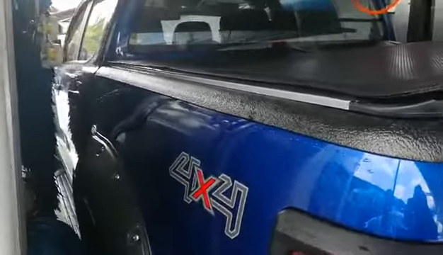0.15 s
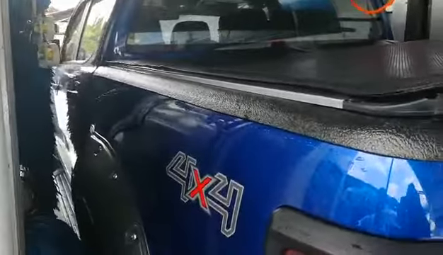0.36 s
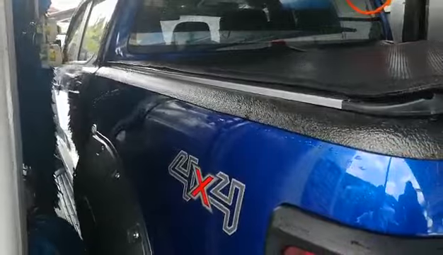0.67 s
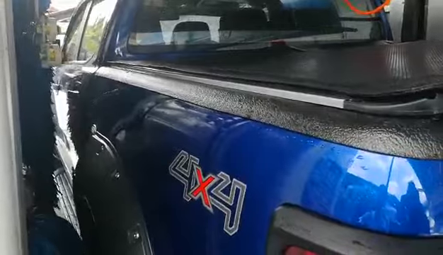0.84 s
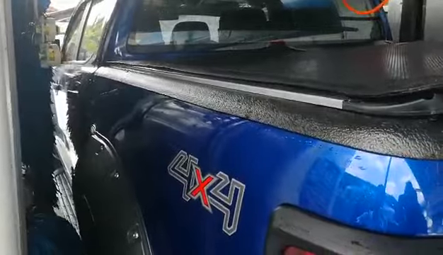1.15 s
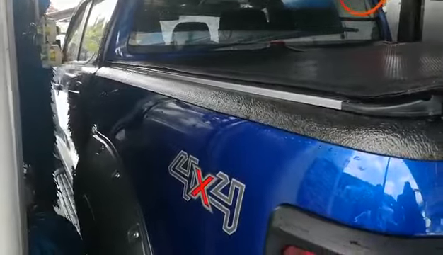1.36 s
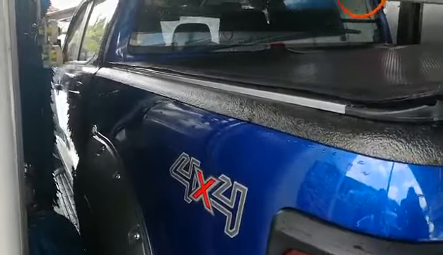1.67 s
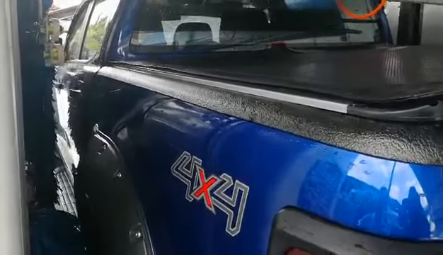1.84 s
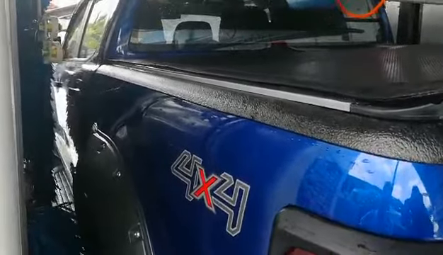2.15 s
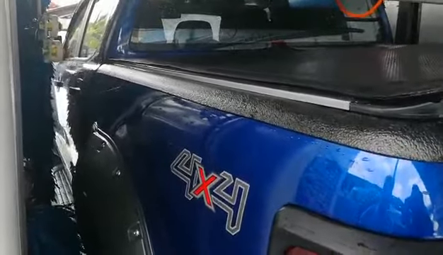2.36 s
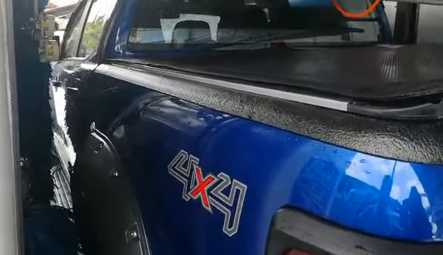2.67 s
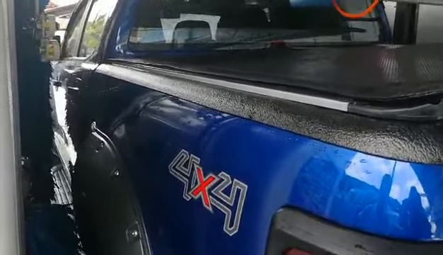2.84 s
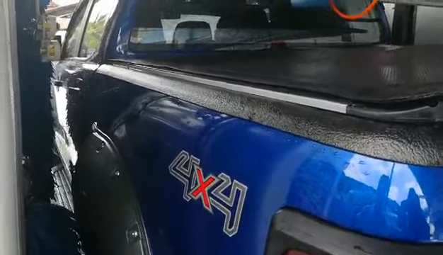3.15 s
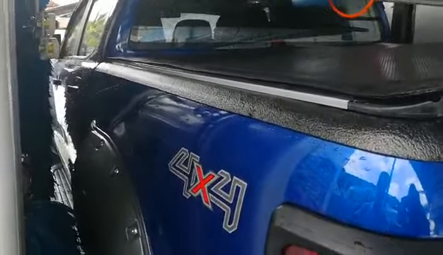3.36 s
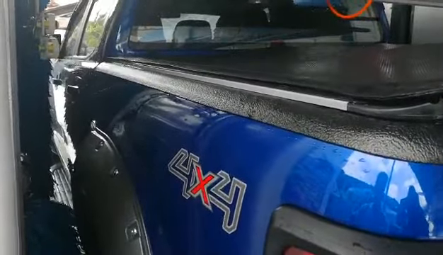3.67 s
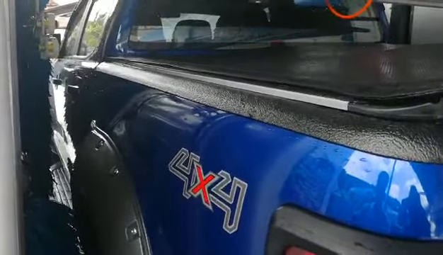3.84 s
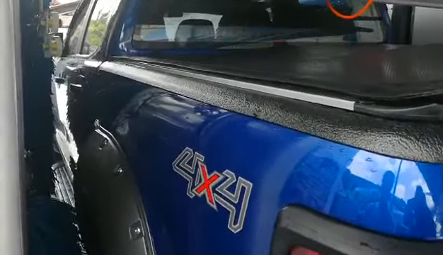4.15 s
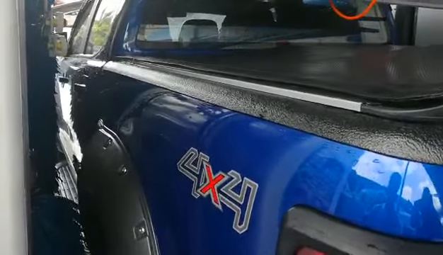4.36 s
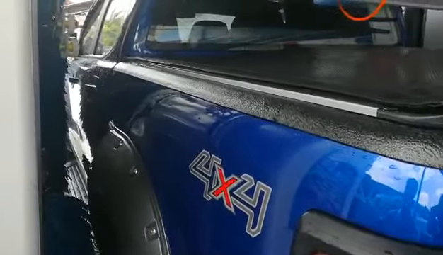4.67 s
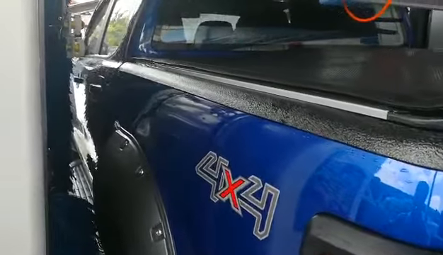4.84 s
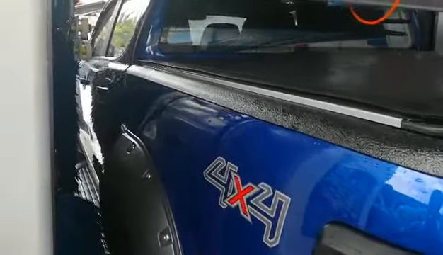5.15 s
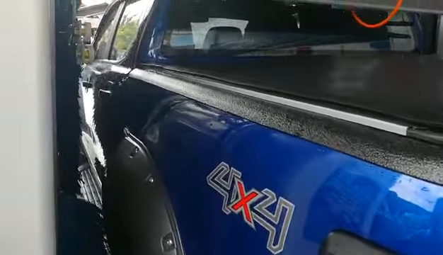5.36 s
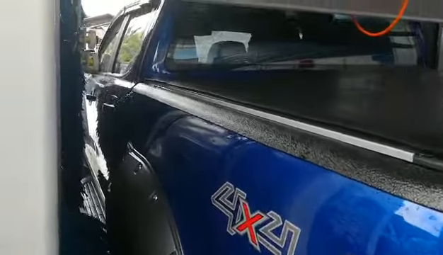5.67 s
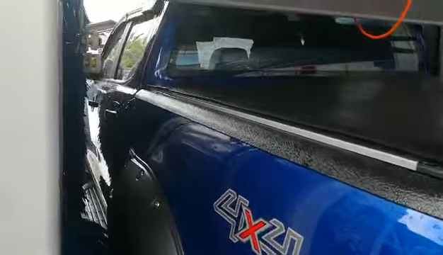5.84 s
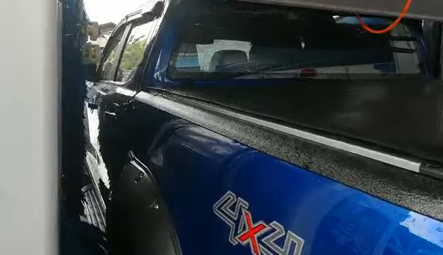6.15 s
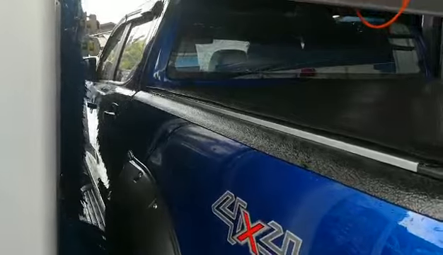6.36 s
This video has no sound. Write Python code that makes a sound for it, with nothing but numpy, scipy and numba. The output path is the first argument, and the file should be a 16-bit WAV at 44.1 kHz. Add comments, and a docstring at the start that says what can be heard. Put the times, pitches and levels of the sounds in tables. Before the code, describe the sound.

Strong wind batters a handheld microphone with thumps, rips and crackles over a steady blower roar in a wash bay, easing near the end.

```python
"""Drying blowers roar in a wash bay while their air stream buffets a hand-held two-port recorder.
From the start, shaped noise makes the roar, wind rumble and rush; lumps and knocks thump on both ports.
Tearing noise bursts and ringing snaps mark the left port, softer flutters the right.
A limiter ducks on strong gusts, so the roar pumps. Late on the wind lets up, with only a few last bumps.
"""
import sys
import numpy as np
from scipy import signal
from scipy.fft import rfft, irfft
from scipy.io import wavfile
from scipy.ndimage import uniform_filter1d, minimum_filter1d
from numba import njit

SR = 44100
rng = np.random.default_rng(int(sys.argv[2]) if len(sys.argv) > 2 else 0)


def wav_out(sig):
    """Save sig, one row per channel (or a flat mono array), as 16-bit PCM at SR to the path in sys.argv[1]."""
    wavfile.write(sys.argv[1], SR, np.round(np.clip(np.atleast_2d(sig).T, -1, 1) * 32767).astype(np.int16))


N = 287091

# All levels in the tables are relative, ahead of the recorder's limiter.
# Blower strength over time: time_s, roar_db, extra_treble_db
BLOWER_LEVELS = [(0, -12.5, -2.5), (0.5, -12, -3), (1.04, -11, -0.5), (1.25, -11, -2.5), (1.5, -9, -4.5),
                 (2, -9, -3), (2.5, -9, -3.5), (2.8, -8, -3.5), (3, -10, -1.5), (3.2, -13, -1.5),
                 (3.5, -13, 0.5), (3.75, -10.5, 0.5), (4, -12.5, 3.5), (4.2, -15.5, 4), (4.35, -18, 4),
                 (4.55, -15.5, 3), (4.67, -13, 4), (4.83, -16, 3.5), (5, -18.5, 4), (5.12, -20.5, 4.5),
                 (5.25, -19, 0.5), (5.4, -19, 4.5), (5.55, -19.5, 3), (5.66, -17.5, 1), (5.8, -20, 4.5),
                 (6.1, -20, 4.5), (6.3, -20.5, 4.5), (6.51, -20.5, 4)]
# Tone of the blower roar: pitch_hz, level_db (per Hz)
ROAR_COLOUR = [(20, -26), (40, -4), (80, -6), (130, -0.5), (200, 2.5), (300, -2.5), (450, -16), (650, -9.5),
               (1000, -10.5), (1500, -9), (1800, -6), (2150, -4.5), (2600, -6.5), (3100, -14), (6000, -25)]
# How much louder the roar is on the left: pitch_hz, left_minus_right_db
ROAR_BALANCE = [(60, 0.5), (92, 0.5), (140, 0.0), (210, 0.0), (330, -0.5), (500, 1.0), (760, 4.5),
                (1160, 2.5), (1770, 6.5), (2700, 6.0), (4120, -0.5), (6290, 0.0), (9600, 7.5), (14600, 0.5)]
# How alike the roar is in both ears: pitch_hz, likeness (1 same, 0 unrelated)
ROAR_LIKENESS = [(60, 0.92), (110, 0.92), (200, 0.94), (380, 0.68), (690, 0.28), (1270, 0.37), (2340, -0.1),
                 (4320, 0.03), (7950, 0.01), (14600, 0.01)]
# Humps of the nozzle roar: pitch_hz, width_hz, swing_db, rate_hz (speed limit of the swelling)
NOZZLE_HUMPS = [(1800, 300, 1.5, 5), (2150, 300, 1.5, 6), (2500, 350, 1.5, 5)]
# Strength of the wind on the ports, with its lulls: time_s, level_db
WIND_LEVELS = [(0, -7), (0.25, -10.5), (0.5, -6.5), (0.72, -14), (0.84, 2.5), (0.96, -26), (1.22, -4),
               (1.5, -18), (1.68, -2), (1.86, -12), (2.04, -5.5), (2.2, -11.5), (2.4, -1.5), (2.52, -20),
               (2.66, -5.5), (3.2, -7), (3.48, -10.5), (3.8, -16.5), (3.98, -0.5), (4.35, -26.5),
               (4.56, -1.5), (4.7, -22), (5.1, -39), (5.3, -20), (5.9, -35), (6.51, -41)]
# Low lumps of pressure on both ports: peak_s, level_db, width_ms (before rise and fall stretch it)
BUFFET_LUMPS = [(0.033, -11, 11), (0.06, 0, 14), (0.164, -3, 13), (0.212, 6.5, 9.4), (0.232, -5.5, 8.5),
                (0.296, -8, 7.3), (0.352, -6, 14), (0.393, 0.5, 27), (0.478, -5, 13), (0.537, -9, 12),
                (0.555, -3.5, 9.6), (0.59, 1.5, 10.5), (0.646, -2, 32), (0.687, -1.5, 10), (0.737, 0.5, 10),
                (0.851, 0, 11), (0.887, -3, 8.4), (1.008, -3.5, 23), (1.065, -11, 14), (1.103, 5, 22),
                (1.143, -1, 26), (1.194, -4, 20), (1.253, 1, 14), (1.281, -5, 11), (1.299, -4.5, 11),
                (1.384, -4.5, 23), (1.455, 0.5, 48), (1.508, 0, 8.6), (1.543, 0, 7.1), (1.573, 2.5, 22),
                (1.65, 0, 15), (1.685, 4.5, 18), (1.726, 6, 11), (1.831, 6, 37), (1.892, -2, 7.7),
                (1.983, 0, 15), (2.035, -4.5, 20), (2.111, 8.5, 12), (2.166, -6.5, 11), (2.196, -10, 6.2),
                (2.261, 3, 16), (2.288, -3, 20), (2.334, 1.5, 9.9), (2.365, -20, 8.9), (2.405, -4, 7.7),
                (2.438, -0.5, 37), (2.54, -6.5, 18), (2.609, 0.5, 12), (2.665, 5, 17), (2.713, 0, 20),
                (2.76, 0, 10), (2.82, -9, 28), (2.844, -10, 9.4), (2.879, -20, 8), (2.927, 6, 8.1),
                (2.995, 5, 9.1), (3.042, -4, 15), (3.067, -1.5, 15), (3.137, -6, 8.1), (3.179, -12, 12.8),
                (3.26, 0.5, 31), (3.297, -0.5, 20), (3.347, 5, 8.5), (3.374, 1.5, 11), (3.413, -3, 24),
                (3.481, -7.5, 7.4), (3.561, 0.5, 31), (3.623, -1, 31), (3.683, 3.5, 24), (3.707, 9.5, 10),
                (3.729, -4, 16), (3.75, -10, 16), (3.9, 3, 10), (3.924, -0.5, 23), (3.958, 2, 11),
                (4.02, 0.5, 12), (4.108, -13, 13), (4.165, -13, 8.9), (4.186, -10.5, 6.8), (4.216, -7, 7.6),
                (4.258, -12, 9.1), (4.292, -5.5, 16.4), (4.331, -7.5, 15), (4.358, -7, 7.2),
                (4.378, -11, 7.8), (4.398, -7.5, 18), (4.457, -6.5, 6.6), (4.502, -2.5, 23),
                (4.558, 2, 7.3), (4.58, 4.5, 9), (4.61, 9, 5.2), (4.64, -11, 20), (4.7, -16, 30),
                (4.735, -8.5, 14), (4.757, -7.5, 26), (4.782, -13.5, 8.7), (4.807, -10, 12),
                (4.827, -8, 17), (4.859, -14, 9.1), (5.263, -16, 20), (5.312, -16, 11), (5.374, -13.5, 22),
                (5.49, -27, 7.7), (5.572, -9.5, 9), (5.59, -11, 17), (5.605, -12, 18), (5.635, -17, 35),
                (5.68, -21, 30)]
# Tone of the wind shared by both ports: pitch_hz, level_db (per Hz)
RUMBLE_COLOUR = [(12, 3.5), (25, -7), (40, 2.5), (80, 1), (150, 2), (250, -4.5), (400, -10.5), (700, -21),
                 (1500, -54), (5000, -110)]
# Tone of the deepest bass in the lumps: pitch_hz, level_db (per Hz)
THUMP_COLOUR = [(12, 5.5), (25, -10), (60, 0), (110, 11), (200, -39), (600, -65)]
# Tone of the rumble that pushes the two ports in opposite ways: pitch_hz, level_db (per Hz)
OPPOSED_COLOUR = [(20, -14), (35, -13), (60, -5), (130, 2), (220, 4), (350, -13), (700, -41), (3000, -100)]
# Tone of the higher rush, also used for the flutters: pitch_hz, level_db (per Hz)
RUSH_COLOUR = [(40, -13), (100, 1), (200, -10.5), (350, 3), (600, -1), (1000, -6.5), (1800, -24),
               (3500, -46), (9000, -110)]
# Single hard eddies on both ports: middle_s, level_db, half_width_ms (before the stretches below)
HARD_KNOCKS = [(0.0534, 5.5, 2.9), (0.1918, 9, 0.85), (0.231, 9, 1.6), (0.35, 12.5, 1.52),
               (0.5377, 6.5, 1.1), (0.6466, 6.5, 0.66), (0.7365, 2.5, 1.1), (0.855, 5.5, 2.3),
               (1.0112, 3, 1.5), (1.0833, 7, 1.9), (1.2492, 10.5, 1.5), (1.4168, 4.5, 0.86),
               (1.4526, 10, 0.73), (1.6439, 12.5, 2), (1.726, 7.5, 1.1), (1.8218, 12.5, 1.8),
               (2.262, 7, 0.31), (2.404, 4, 0.41), (2.6084, 4, 0.65), (2.8183, 9.5, 2.2), (2.9251, 13, 1.5),
               (2.9556, 12.5, 0.87), (2.9945, 11.5, 0.97), (3.2655, 9.5, 1.4), (3.3476, 9, 0.87),
               (3.4102, 4.5, 0.82), (3.5569, 9, 2.3), (3.6234, 7, 1.3), (3.6801, 8, 1.2), (3.7059, 14, 0.9),
               (3.8975, 10, 0.85), (3.9237, 14.5, 1.1), (3.9564, 7, 1.4), (4.0155, -2, 0.52),
               (4.1078, 8, 1.35), (4.2918, -2.5, 1.8), (4.3332, 4.5, 1.9), (4.395, -2, 1.4),
               (4.456, 5, 1.3), (4.5571, 11, 1.16), (4.611, 4.5, 3), (4.761, 1, 1.3), (4.8048, -3.5, 0.58),
               (5.2642, 0, 0.8), (5.5708, 0, 1.26), (5.59, -7, 1.3)]
# Strong tearing bursts, left port: peak_s, level_db, width_ms (before rise and fall),
# bright_db (bright part over dull part, before TEAR_BRIGHT_DB)
STRONG_TEARS = [(0.054,-3.5,6.5,-2), (0.075,0,4.3,-10), (0.123,3.5,4.5,-24), (0.19,2,9,4), (0.213,2,3,-6),
                (0.231,0.5,3.6,3), (0.249,-6,3.8,4), (0.35,2.5,4,-16), (0.361,5,10,-10), (0.369,-4,4.4,-11),
                (0.381,9,6.1,-3.5), (0.394,1,3.7,-1), (0.403,-1,4.2,0), (0.416,4,9.4,-16), (0.459,0,2.4,-3),
                (0.464,-4.5,5.7,4.5), (0.493,3,2.2,-6), (0.503,7,2.2,3.5), (0.534,6.5,3.5,1), (0.542,1,5,4),
                (0.552,-2,6.4,3), (0.582,-1.5,5.5,-0.5), (0.633,-2,3.6,-11), (0.646,7.5,4.1,-7),
                (0.653,5.5,5.9,-9), (0.737,7.5,1.6,-10), (0.794,6.5,2.4,0), (0.804,7.5,2.4,2),
                (0.829,12,2.3,0), (0.845,-2.5,3.6,8), (0.861,-4,8.6,-2), (1.006,-1,3.5,-4),
                (1.088,1,14,-21), (1.105,6,3.9,-13), (1.147,-5,5.4,-9), (1.183,-8,2.1,-13),
                (1.199,-6,2.2,-24), (1.219,2,7.6,-27), (1.227,0,5.1,-2), (1.246,8,4.9,-22), (1.263,10,3,-4),
                (1.273,1,9.4,1), (1.281,3,3.5,-8), (1.299,-0.5,4.1,-4), (1.381,-1.5,9.4,-9),
                (1.443,8.5,2.5,-13), (1.461,0,12,-2), (1.481,3.5,4.2,2.5), (1.495,-3,2.9,-10),
                (1.545,2,6.8,-18), (1.561,0.5,9.4,-0.5), (1.569,4,5,-8), (1.584,-9,6.6,-2), (1.646,3,5.7,5),
                (1.653,6,10,3.5), (1.684,6,2.3,-5.5), (1.696,-2,5.3,-8), (1.717,4,4,-8), (1.724,7.5,10,-4),
                (1.736,5,8.4,-9), (1.754,1,11,-17), (1.809,-11,3.6,-6), (1.831,8.5,6.6,3),
                (1.842,8.5,7.9,-6), (1.854,3.5,5.2,-5), (1.873,3,4.7,-7), (1.892,6,2.6,4.5),
                (1.914,-1,4.7,-9), (1.986,1,11,-22), (2.035,-5,4.5,-7), (2.053,-1,4.1,-15),
                (2.061,4.5,5.9,-17), (2.068,-1,3.7,-11), (2.076,1,4.9,6), (2.088,1,16,-14), (2.1,4,5.6,10),
                (2.107,2.5,8.2,5.5), (2.115,0,3,9), (2.165,1.5,6,-13), (2.245,0,12,-22), (2.265,1,8.8,-28),
                (2.318,3,11,-14), (2.328,4.5,8.8,-10), (2.354,2.5,3.1,-6), (2.388,-5,3.3,-11),
                (2.405,-5,2.7,-11), (2.414,3.5,2.9,-14), (2.45,9,5.2,0), (2.607,5,3.7,-14), (2.654,13,3,-3),
                (2.663,7,7.2,-6), (2.674,9.5,2,-7), (2.694,7,9.5,-4), (2.712,14,5.8,-11), (2.729,3,2.7,-25),
                (2.747,3,3.6,-15), (2.817,2,4.5,-9), (2.927,6,6.8,-5), (2.934,2,8.8,3), (2.943,5,7.4,2),
                (2.955,5,8.1,-15), (2.965,4,13,-5), (2.982,2.5,8.6,2.5), (2.994,8,3.4,-1),
                (3.002,4,14,-4.5), (3.043,-3,6.6,-12), (3.071,1.5,5.9,-16), (3.198,2.5,5.7,-14),
                (3.264,4,2.8,-20), (3.304,-4.5,6.6,-13), (3.332,4,2.3,-18), (3.348,6,4,-24),
                (3.355,-5,5.7,-12), (3.367,1,3.7,-6), (3.376,-7,6.8,-9), (3.387,-3,5.6,-17),
                (3.414,-7,4.2,-15), (3.558,4.5,5.7,-10), (3.593,-3,15,-21), (3.69,2,9.1,-10),
                (3.707,5,3.7,-9), (3.714,5,3.5,-4), (3.726,-2,4,-11), (3.9,5,8.3,-13), (3.913,0,4.9,-10),
                (3.924,12,4.1,-8), (3.935,2,5.9,-6), (3.959,9,6.4,-25), (3.981,1,14,-10),
                (4.012,6.5,10.8,-18), (4.558,-3,4.2,-4), (4.611,-3,8.9,-23), (5.259,3.5,6,-25),
                (5.606,-6,6.5,-9)]
# Tone of the dull part of a tear: pitch_hz, level_db (per Hz)
DULL_COLOUR = [(200, -4.5), (450, 3.5), (800, 2.5), (1300, -7), (1900, -8.5), (2800, -54), (4500, -52),
               (9000, -100)]
# Tone of the bright part of a tear: pitch_hz, level_db (per Hz)
BRIGHT_COLOUR = [(1000, 3), (1700, 9.5), (2300, 11.5), (3000, 2), (4200, -15), (5500, -22), (7000, -50),
                 (9000, -56)]
# Sharp pops at the left port: peak_s, peak_db, pitch_hz, fade_ms
SHARP_SNAPS = [(0.0538, 11, 1200, 0.6), (0.055, 4.5, 1620, 1.2), (0.0745, 0, 1750, 0.6),
               (0.1228, 4, 1100, 0.7), (0.1807, 1, 1850, 0.6), (0.1902, 7, 1980, 0.6),
               (0.1936, -2, 1980, 0.6), (0.1973, 0, 1990, 0.6), (0.2307, 6, 1890, 0.6),
               (0.348, 7, 1000, 0.86), (0.3696, 1, 1630, 0.6), (0.3788, 12, 1500, 0.7),
               (0.3811, 6, 2020, 0.6), (0.3945, 8, 1650, 0.68), (0.4203, 2, 1500, 0.6),
               (0.424, 5, 1870, 0.6), (0.4644, 6, 2400, 0.55), (0.4929, 8, 1770, 0.66),
               (0.4934, -2, 3770, 0.23), (0.4975, -7, 3800, 0.4), (0.5027, 4, 1880, 0.6),
               (0.5336, -3, 1350, 0.6), (0.5405, 5, 3000, 0.6), (0.5415, 6, 4000, 0.3),
               (0.543, 3, 2310, 0.54), (0.5447, 7, 2300, 0.7), (0.5479, 7, 2390, 0.6),
               (0.5517, 4, 1740, 0.6), (0.583, -1, 2150, 0.55), (0.645, 3, 1200, 0.7),
               (0.652, -4, 1430, 0.6), (0.7347, 2, 1610, 0.6), (0.7926, 1, 1830, 0.67),
               (0.8295, 4, 1660, 0.67), (0.8675, 0, 1940, 0.69), (0.9908, -1, 2310, 0.6),
               (1.0064, -1, 1870, 0.51), (1.1006, 0, 1800, 0.6), (1.1048, 2, 1170, 0.6),
               (1.2271, 4, 1720, 0.6), (1.246, 11, 1300, 0.59), (1.247, -1, 1790, 0.6),
               (1.2595, 7, 1830, 0.6), (1.2626, 10, 1830, 0.69), (1.281, 1, 1600, 0.6),
               (1.2986, 2, 1870, 0.6), (1.3047, 4, 1910, 0.6), (1.4434, 10, 1700, 0.73),
               (1.4526, 6, 1980, 0.6), (1.4583, 9, 2250, 0.6), (1.4615, 1, 1610, 0.6),
               (1.4807, 3, 1950, 0.55), (1.543, 6, 1100, 0.7), (1.561, 11, 2050, 0.55),
               (1.6443, 7, 2000, 0.8), (1.6465, 1, 2060, 0.6), (1.6478, 10, 3530, 0.6),
               (1.6512, 8, 2100, 0.8), (1.6536, 5, 2010, 0.6), (1.6588, -2, 1200, 0.5),
               (1.6842, 4, 1510, 0.6), (1.723, 4, 1730, 0.6), (1.7274, 7, 1840, 0.6),
               (1.8248, 10, 1860, 0.6), (1.8307, -4, 1800, 0.6), (1.8323, 5, 3530, 0.44),
               (1.8345, 6, 1740, 0.6), (1.8419, 12, 1490, 0.6), (1.8737, 6, 1990, 0.6),
               (1.8927, 16, 1900, 0.6), (1.9815, -3, 1900, 0.53), (2.0356, -3, 1870, 0.55),
               (2.0763, 2, 2190, 0.6), (2.0997, 6, 1760, 0.65), (2.1028, 7, 3300, 0.7),
               (2.104, 6, 2480, 0.48), (2.1053, 11, 2300, 0.9), (2.1064, 9, 2600, 0.8),
               (2.1066, 17, 2090, 0.6), (2.1142, 1, 2600, 0.8), (2.1155, 2, 2180, 0.6),
               (2.3224, 6, 1710, 0.6), (2.3263, 3, 2050, 0.6), (2.3294, 0, 1720, 0.6),
               (2.4494, 4, 1780, 1.1), (2.5124, 0, 2040, 0.6), (2.5839, 5, 2380, 0.6),
               (2.6493, 10, 1300, 0.65), (2.6536, 9, 1510, 0.65), (2.6628, 2, 1780, 0.6),
               (2.695, 13, 1840, 0.68), (2.7055, 10, 1620, 0.6), (2.7089, 5, 1720, 0.6),
               (2.7117, 7, 1590, 0.6), (2.9268, 1, 1200, 0.94), (2.9285, 6, 1770, 0.6),
               (2.9322, 5, 2100, 0.55), (2.9348, 3, 2160, 0.5), (2.9437, -1, 1710, 0.6),
               (2.9639, 7, 1890, 0.6), (2.9824, 7, 2070, 0.6), (2.9988, 2, 1970, 0.6),
               (3.0025, 2, 1950, 0.6), (3.1758, 0, 2330, 0.65), (3.5361, -3, 2190, 0.51),
               (3.5447, 1, 2160, 0.6), (3.5577, 1, 1920, 0.67), (3.6929, 2, 1440, 0.6),
               (3.7139, 6, 1910, 0.65), (3.9009, 4, 1300, 0.6), (3.9058, 1, 1420, 0.6),
               (3.9238, 6, 1620, 0.54), (3.935, 7, 1610, 0.6), (3.9567, 0, 1490, 0.6),
               (4.0094, -1, 1750, 0.6), (4.0128, 10, 1990, 0.6), (5.2581, -4, 1610, 0.53),
               (5.2595, -2, 1010, 1.5), (5.6057, -2, 1530, 0.3)]
# Strong, duller flutters, right port: peak_s, level_db, width_ms (before rise and fall)
STRONG_FLUTTERS = [(0.124, 4, 5.1), (0.153, 0, 2.6), (0.354, 3, 6.9), (0.379, 5, 4.8), (0.535, -6, 17),
                   (0.649, -3, 37), (1.191, 6, 4.6), (1.46, 2, 13), (1.653, -9, 8.5), (1.729, 4, 12),
                   (2.108, 4.5, 18), (2.266, 10, 2.7), (2.312, 3, 19), (2.44, 1, 4.6), (2.612, 4.5, 11),
                   (2.647, 6, 10), (2.748, 1, 16), (3.043, 2.5, 11), (3.243, 7, 8.6), (3.263, 8, 9.1),
                   (3.312, -4, 32), (3.349, -4.5, 62), (3.576, 3, 11), (4.56, 5, 4.9), (4.611, 1, 12),
                   (5.259, -15, 41), (5.572, -2, 6.5)]
# What the mix carries from left to right: pitch_hz, level_db
LEFT_INTO_RIGHT = [(100, 0), (400, -2), (800, -6), (1500, -11), (2500, -15), (4000, -24)]
# Extra lag of that carried sound: pitch_hz, lag_radians
MIX_PHASE_LAG = [(150, 0), (300, .8), (450, 1.05), (800, .65), (1400, .6), (2300, 0)]
# Top end of the microphone: pitch_hz, level_db
MIC_TOP = [(6000, 1), (6900, 4), (7800, 3.5), (8400, -13), (9200, -24), (10000, -33.5), (10600, -16.5),
           (12000, -22), (15000, -22)]

# Weaker eddies at random moments; over_db is counted from the wind level
SMALL_TEARS = dict(count=25, over_db=-5, spread_db=5, width_ms=3)
SMALL_FLUTTERS = dict(count=45, over_db=-1.5, spread_db=5, width_ms=2.8)
SMALL_TEAR_BRIGHT_DB, TEAR_BRIGHT_DB = -21, -2.5   # the second is added for every tear, small ones too
KNOCK_STEEPNESS, SUCK_STRETCH, PUSH_STRETCH = 1.5, 1.8, 1.3   # slope of the slam; dip, push in half widths
SNAP_RISE_MS = 0.23
PORT_LAG = 27   # samples
BASS_CUT_HZ, CUTOFF_HZ = 18, 15220


def from_db(db):
    """Turn decibels into gain."""
    return 10 ** (np.asarray(db) / 20)


def rms_one(x):
    """Scale to an rms of one."""
    return x / np.sqrt(np.mean(x ** 2) + 1e-20)


def in_time(rows):
    """Read each column of a time table at every sample."""
    s, *columns = np.transpose(rows)
    t = np.arange(N) / SR
    return [np.interp(t, s, column) for column in columns]


def at_hz(points):
    """Read a pitch table at every FFT bin, on a log pitch scale."""
    table_hz, values = np.transpose(points)
    hz = np.maximum(np.arange(N // 2 + 1) * SR / N, 1)
    return np.interp(np.log(hz), np.log(np.maximum(table_hz, 1)), values)


def colour(x, points):
    """Filter by a table of pitch and level."""
    return irfft(rfft(x) * from_db(at_hz(points)), N)


def drift(rate_hz):
    """Random wandering with rms one: noise with everything faster than rate_hz filtered down."""
    lowpass = signal.butter(2, rate_hz, fs=SR, output="sos")
    slow = signal.sosfilt(lowpass, rng.standard_normal(N + SR))
    return rms_one(slow[SR:])   # drop the first second, while the filter settles


def turbulence(points, even_s):
    """Coloured noise held at an even short-term level, so that an envelope alone sets its strength."""
    x = colour(rng.standard_normal(N), points)
    span = max(int(even_s * SR), 8)
    power = uniform_filter1d(uniform_filter1d(x ** 2, span), span)
    return rms_one(x / np.sqrt(power + 1e-12))


def swells(times, level_db, width_ms, rise, fall):
    """Add bell-shaped bursts of power, rise and fall scaling each side; return the amplitude envelope."""
    power = np.zeros(N)
    for s, db, ms in zip(times, level_db, width_ms):
        span = ms * SR / 1000
        first = max(int(s * SR - 4 * rise * span), 0)
        last = min(int(s * SR + 4 * fall * span), N)
        at = np.arange(first, last)
        since = (at - s * SR) / span
        side = np.where(since < 0, rise, fall)
        power[at] += from_db(2 * db) * np.exp(-.5 * (since / side) ** 2)
    return np.sqrt(power)


def small_eddies(count, over_db, spread_db, width_ms):
    """Rows of time, level and width at random moments, their levels following the wind there."""
    when, louder, wider = rng.uniform(0, 1, (count, 3)).T
    s = when * N / SR
    wind_db = np.interp(s, *np.transpose(WIND_LEVELS))
    chance_db = spread_db * np.log(louder / (1 - louder)) / 2
    return np.transpose([s, wind_db + over_db + chance_db, width_ms * (.5 + wider)])


def blowers():
    """Broad smooth jet noise filling the bay; the treble opens as the stream turns."""
    roar_db, treble_db = in_time(BLOWER_LEVELS)
    # a shared and an opposed noise, mixed to give the wanted likeness at each pitch
    mid, side = rfft(rng.standard_normal((2, N)))
    alike = np.clip(at_hz(ROAR_LIKENESS), -1, 1)
    sign = np.array([[1], [-1]])
    pair = np.sqrt(1 + alike) * mid + sign * np.sqrt(1 - alike) * side
    pair = pair * from_db(at_hz(ROAR_COLOUR) + sign * at_hz(ROAR_BALANCE) / 2)
    air = wavering(rms_one(irfft(pair, N)))
    # low and treble parts flicker separately
    low = signal.sosfiltfilt(signal.butter(1, 1200, fs=SR, output="sos"), air)
    low_flicker = from_db(1.5 * drift(12))
    treble_gain = from_db(treble_db + 0.52 * drift(27))
    return from_db(roar_db) * (low * low_flicker + treble_gain * (air - low))


def wavering(air):
    """The nozzle resonance wanders: each hump in the roar swells and sinks on its own."""
    out = air
    for hz, width_hz, swing_db, rate_hz in NOZZLE_HUMPS:
        edges = [hz - width_hz / 2, hz + width_hz / 2]
        hump = signal.sosfiltfilt(signal.butter(1, edges, "band", fs=SR, output="sos"), air)
        out = out + hump * (from_db(swing_db * drift(rate_hz)) - 1)
    return out


def buffeting():
    """Low pressure lumps reach both ports; a higher rush, flickering faster, is each port's own."""
    s, db, ms = np.transpose(BUFFET_LUMPS)
    lumps = swells(s, db, ms, rise=0.32, fall=0.42)
    push = np.hypot(from_db(in_time(WIND_LEVELS)[0]), lumps)   # wind and lumps together
    rumble = push * from_db(-1.5 + 1.94 * drift(31.5)) * turbulence(RUMBLE_COLOUR, even_s=0.028)
    # the big eddies carry the deepest bass
    rumble += lumps * from_db(-6.5) * turbulence(THUMP_COLOUR, even_s=0.1)
    rumble += knocks()
    opposed = push * from_db(-8.0) * turbulence(OPPOSED_COLOUR, even_s=0.095)
    left_rush = push * from_db(-6.0 + 3.5 * drift(61)) * turbulence(RUSH_COLOUR, even_s=0.014)
    right_rush = push * from_db(-30.0 + 3.3 * drift(60)) * turbulence(RUSH_COLOUR, even_s=0.0085)
    return rumble, opposed, left_rush, right_rush


def knocks():
    """A passing eddy sucks the membrane out, then slams it back: one dip and one push."""
    out = np.zeros(N)
    for s, db, ms in HARD_KNOCKS:
        at = np.arange(max(int((s - .03) * SR), 0), min(int((s + .03) * SR), N))
        since = (at / SR - s) * 1000 / ms   # in half widths
        stretch = np.where(since < 0, SUCK_STRETCH, PUSH_STRETCH)
        slam = np.tanh(KNOCK_STEEPNESS * since)
        out[at] += from_db(db) * slam * np.exp(-.5 * (since / stretch) ** 2)
    return out


def tears():
    """Eddies shed at the left port edge: short ragged bursts, each with a dull and a bright part."""
    small = [(*row, SMALL_TEAR_BRIGHT_DB) for row in small_eddies(**SMALL_TEARS)]
    s, db, ms, bright_db = np.vstack([STRONG_TEARS, small]).T
    ragged = from_db(3 * np.clip(drift(450), -3, 1.8) - 1.5)
    dull = swells(s, db, ms, rise=.2, fall=.45) * turbulence(DULL_COLOUR, even_s=.003)
    bright_envelope = swells(s, db + bright_db + TEAR_BRIGHT_DB, ms, rise=.2, fall=.4)
    bright = bright_envelope * turbulence(BRIGHT_COLOUR, even_s=.003)
    return ragged * (dull + bright)


def snaps():
    """An eddy bursts at the port edge: a sudden spike and a short, fading ring."""
    out = np.zeros(N)
    for (s, db, hz, ms), turn in zip(SHARP_SNAPS, rng.uniform(0, 1, len(SHARP_SNAPS))):
        at = np.arange(max(int((s - .003) * SR), 0), min(int((s + .012) * SR), N))
        since = at / SR - s
        rise = np.exp(-.5 * (since * 1000 / SNAP_RISE_MS) ** 2)
        fade = np.exp(-np.abs(since) * 1000 / max(ms, .1))
        shape = np.where(since < 0, rise, fade)
        flip = np.round(turn) / 2   # half a cycle or none: the spike points up or down by chance
        out[at] += from_db(db) * shape * np.cos(2 * np.pi * (hz * since + flip))
    return out


def flutters():
    """Eddies at the right port: softer and lower bursts of noise."""
    s, db, ms = np.vstack([STRONG_FLUTTERS, small_eddies(**SMALL_FLUTTERS)]).T
    return swells(s, db, ms, rise=0.22, fall=0.16) * turbulence(RUSH_COLOUR, even_s=0.04)


def across(x):
    """What the port mix carries from left to right: late and dull."""
    turn = from_db(at_hz(LEFT_INTO_RIGHT)) * np.exp(-1j * at_hz(MIX_PHASE_LAG))
    return np.roll(irfft(rfft(x) * turn, N), PORT_LAG)


def scene():
    """The recorder mixes its ports: left wind shows late on the right, right wind inverted on the left."""
    rumble, opposed, left_rush, right_rush = buffeting()
    torn = left_rush + tears() + snaps()
    fluttered = right_rush + flutters()
    left = rumble + opposed + torn - from_db(-10.5) * fluttered
    right = np.roll(rumble, PORT_LAG) - opposed + across(torn) + fluttered
    return blowers() + np.array([left, right])


@njit
def duck(over_db, start_db, attack, release, creep_db):
    """Gain in dB: chases the excess fast, then lets go by a share of the cut plus a steady creep."""
    out, cut = np.empty_like(over_db), start_db
    for i in range(len(over_db)):
        if over_db[i] > cut:
            cut += attack * (over_db[i] - cut)
        else:
            cut = max(over_db[i], cut - release * cut - creep_db)
        out[i] = -cut
    return out


def limiter(x, ceiling_db, start_db, attack_s, release_s, creep_db_per_s, ahead_s):
    """Turn both channels down by one gain, set from the highest peak a few milliseconds ahead."""
    half = max(int(ahead_s * SR / 2), 2)
    loudest = np.abs(x).max(axis=0)
    peak = -minimum_filter1d(-loudest, 2 * half + 1, origin=1 - half)   # window shifted ahead
    over_db = np.maximum(20 * np.log10(peak + 1e-9) - ceiling_db, 0)
    attack, release = 1 / (attack_s * SR), 1 / (release_s * SR)
    return x * from_db(duck(over_db, start_db, attack, release, max(creep_db_per_s, 0) / SR))


def record(dry):
    """Microphone top end and bass cut, look-ahead limiter, crests rounded near full scale, steep cut-off."""
    bass_cut = signal.butter(2, BASS_CUT_HZ, "high", fs=SR, output="sos")
    heard = signal.sosfilt(bass_cut, colour(dry, MIC_TOP))
    # the limiter is already 12.1 dB down at the start
    wet = limiter(heard, ceiling_db=-.3, start_db=12.1, attack_s=0.0054, release_s=0.56,
                  creep_db_per_s=26.0, ahead_s=0.009)
    full_scale, knee = .99, 12   # a higher knee bends more sharply
    rounded = wet / (1 + np.abs(wet / full_scale) ** knee) ** (1 / knee)
    return signal.sosfilt(signal.cheby2(20, 60, CUTOFF_HZ, fs=SR, output="sos"), rounded)


dry = scene()
out = record(dry)
wav_out(out)
```